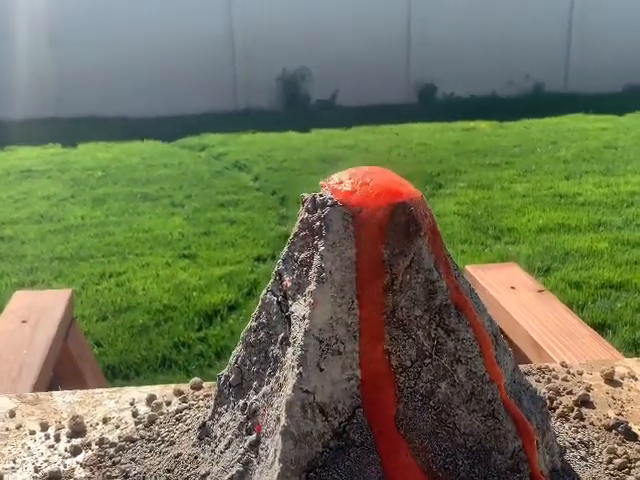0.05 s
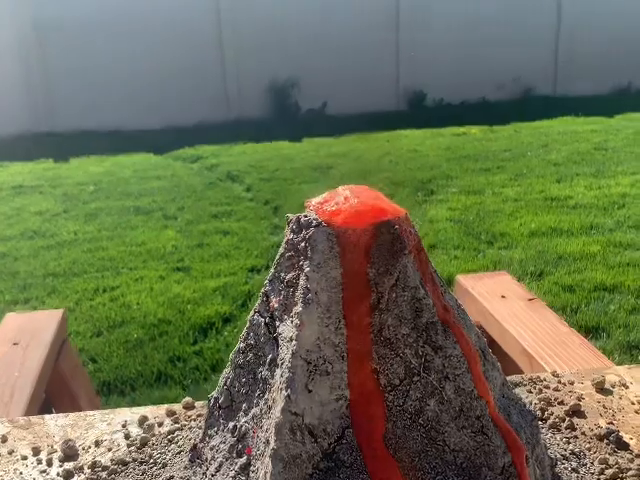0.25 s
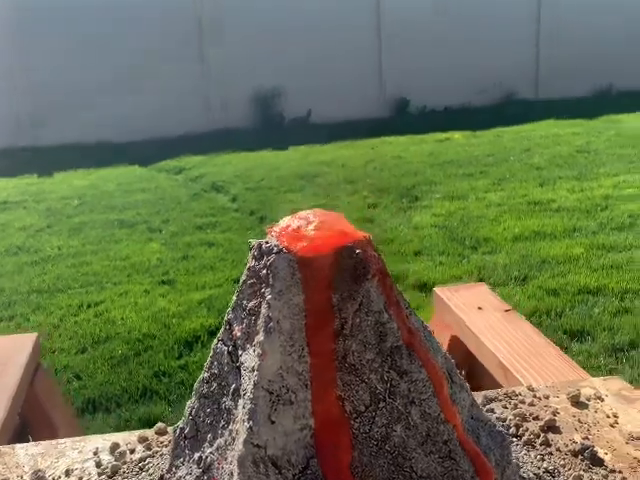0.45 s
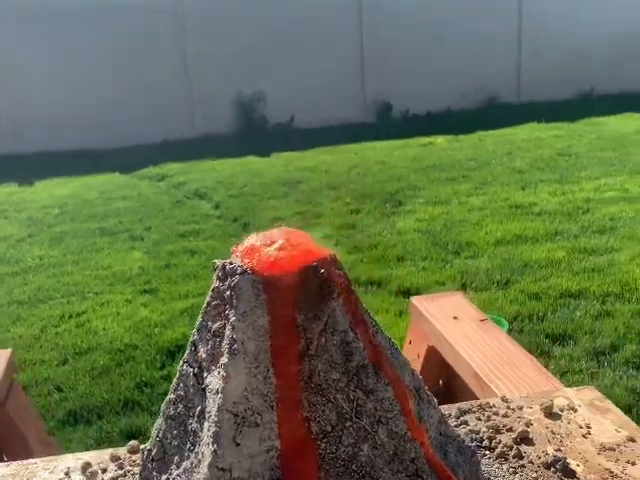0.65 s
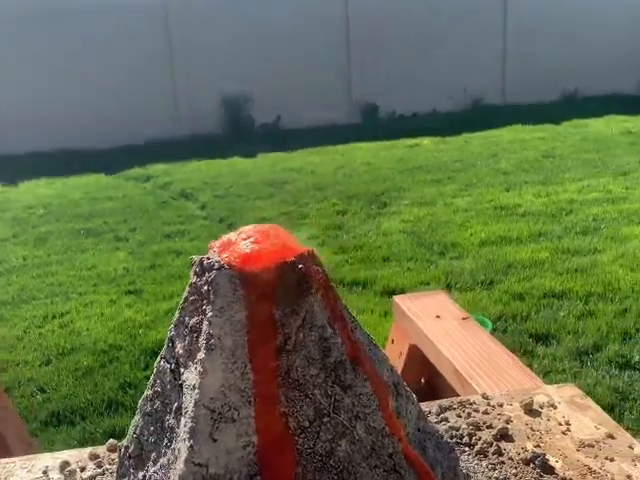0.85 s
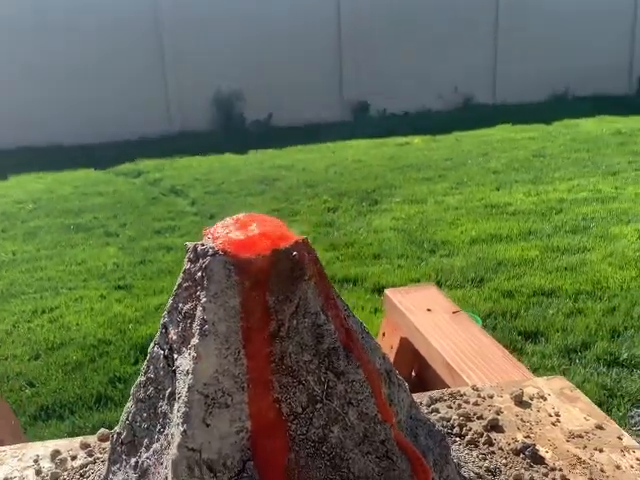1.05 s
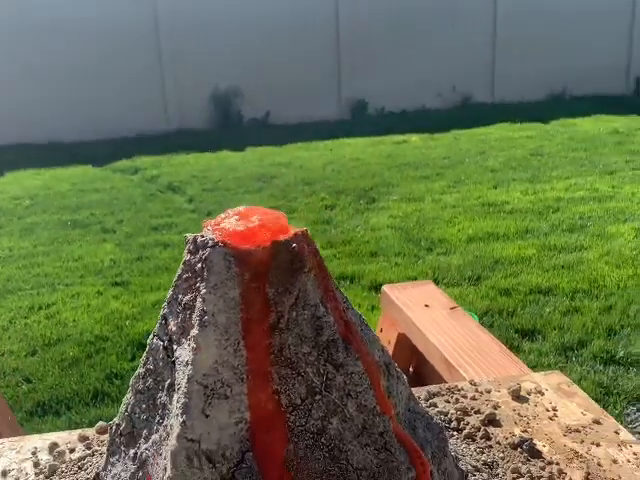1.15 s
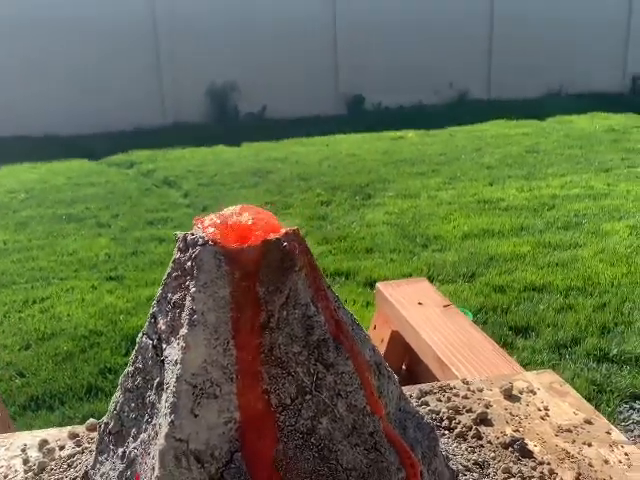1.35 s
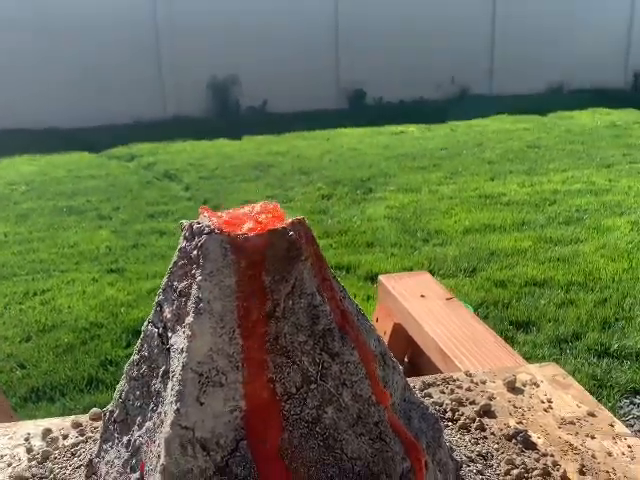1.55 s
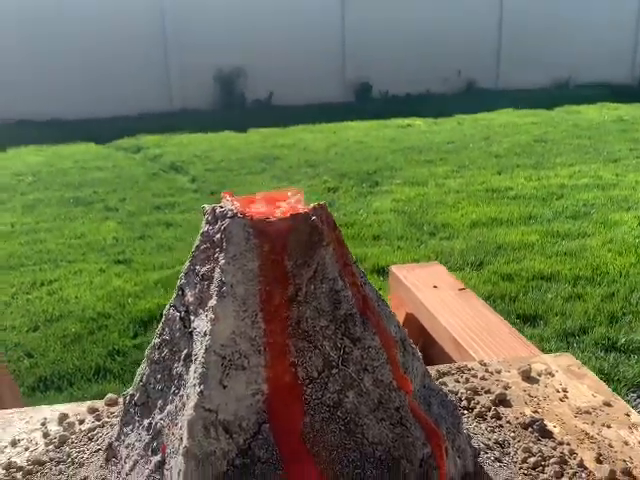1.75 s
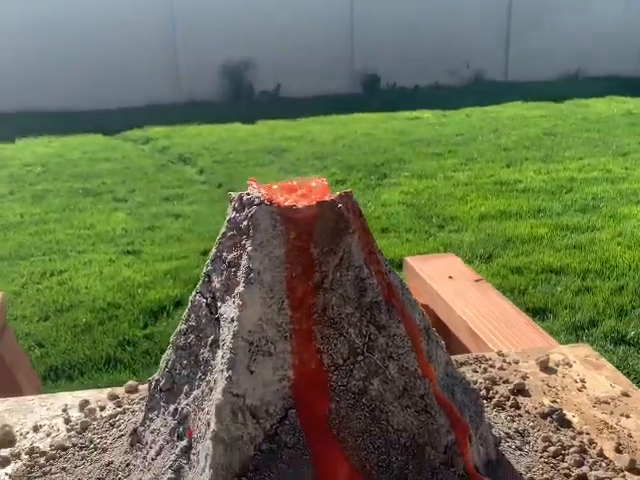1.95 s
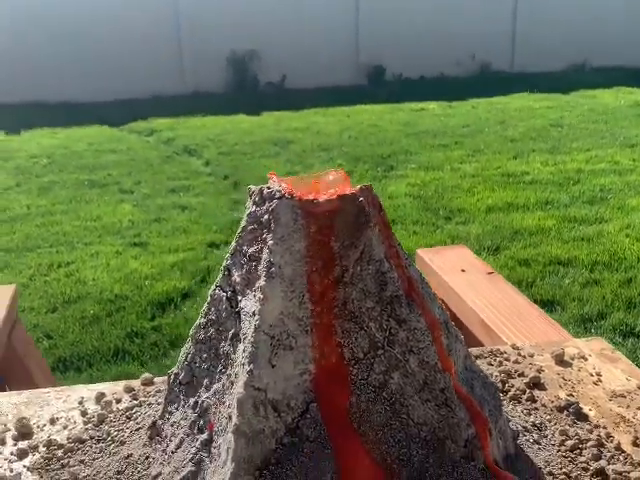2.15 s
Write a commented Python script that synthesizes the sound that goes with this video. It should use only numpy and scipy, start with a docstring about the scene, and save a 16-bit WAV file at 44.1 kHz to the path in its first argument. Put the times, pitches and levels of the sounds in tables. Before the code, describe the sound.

Foam fizzing and popping out of a model volcano, with light wind on the microphone.

```python
"""Fizzing model volcano

Foam fizzes out of a model volcano on a garden table, close to the microphone. Thousands of
tiny bubbles hiss, gas escapes through gaps, and now and then a large bubble bursts with a snap
and a short ring. A light breeze buffets the microphone's two openings over faint outdoor air."""
import sys
import numpy as np
from scipy import signal
from scipy.fft import rfft, irfft
from scipy.io import wavfile
from scipy.ndimage import uniform_filter1d, map_coordinates

SR = 44100
rng = np.random.default_rng(int(sys.argv[2]) if len(sys.argv) > 2 else 0)


def wav_out(sig):
    """Save sig, one row per channel (or a flat mono array), as 16-bit PCM at SR to the path in sys.argv[1]."""
    wavfile.write(sys.argv[1], SR, np.round(np.clip(np.atleast_2d(sig).T, -1, 1) * 32767).astype(np.int16))


N = 97020
POP_SAMPLES = int(.06 * SR)  # room for one bubble's sound to die away


def undb(db):
    """Turn decibels into a number to multiply by."""
    return 10 ** (np.asarray(db) / 20)


def unit(x):
    """Scale a sound to an average power of one."""
    return x / np.sqrt(np.mean(x ** 2))


def curve(table, column=1):
    """Join one column of a table with straight lines in time."""
    rows = np.array(table)
    return np.interp(np.arange(N) / SR, rows[:, 0], rows[:, column])


def along_hz(f, points):
    """Read between (Hz, value) points, giving each octave equal room."""
    hz, value = np.array(points).T
    return np.interp(np.log(np.maximum(f, 1)), np.log(hz), value)


def colour(x, points):
    """Shape a sound's tone by (Hz, dB) points, fading beyond both ends, at a power of one."""
    size = x.shape[-1]
    f = np.fft.rfftfreq(size, 1 / SR)
    ends = (np.minimum(f / points[0][0], 1) / np.maximum(f / points[-1][0], 1)) ** 2
    return unit(irfft(rfft(x) * ends * undb(along_hz(f, points)), size))


def wander(per_s):
    """A smooth random wobble, about one in size."""
    size = int(SR / per_s)
    return unit(uniform_filter1d(uniform_filter1d(rng.standard_normal(N), size), size))


def arrive(x):
    """A sound is heard on both sides: its lows come first on the left, its highs first on the right."""
    f = np.fft.rfftfreq(len(x), 1 / SR)
    right_lag_s = np.where(f < 2510, .00008, -.0002131)
    right = irfft(rfft(x) * np.exp(-2j * np.pi * f * right_lag_s), len(x))
    return np.array([x, right])


def openings(three):
    """Both openings hear the first of three signals; the other two are each side's own reflections."""
    # how alike the two sides are (frequency [Hz], shared part [ratio, held to 0-1 below])
    likeness = [(600, -0.1), (1400, 1), (2300, 0.06), (5500, 0.11), (7500, 0.61), (9300, 0), (11600, 1.55)]
    size = three.shape[-1]
    share = np.clip(along_hz(np.fft.rfftfreq(size, 1 / SR), likeness), 0, 1)
    return irfft(np.sqrt(share) * rfft(arrive(three[0])) + np.sqrt(1 - share) * rfft(three[1:]), size)


def add(out, start_s, sound):
    """Mix a sound in at a given time."""
    i = int(np.clip(start_s * SR, 0, N - 1))
    out[:, i:i + sound.shape[-1]] += sound[..., :N - i]


def air():
    """Faint, distant outdoor rumble."""
    # tone of the open air (frequency [Hz], level [dB])
    air_tone = [(25, -21), (55, 1), (130, -23.5), (300, -46), (1000, -43.5)]
    return colour(rng.standard_normal(N), air_tone) * undb(-59.5)


def turbulence(tone):
    """Swirling air pressure, evened out to a steady strength."""
    swirl = colour(rng.standard_normal(N), tone)
    power = uniform_filter1d(abs(signal.hilbert(swirl)) ** 2, size=700)
    return unit(swirl / np.sqrt(power))


def wind():
    """Gusts rumble on the microphone; strong ones shed small, fast swirls at each opening."""
    # strength of the gusts (time [s], level [dB])
    gusts = [(0.0, -71), (.1, -59), (.145, -42), (.19, -52.5), (0.23, -41.5), (0.27, -24), (0.47, -34.5),
             (0.61, -64.5), (0.675, -43), (0.745, -56), (0.8, -40), (0.92, -42.5), (0.97, -28.5),
             (1.05, -48), (1.18, -30), (1.24, -51), (1.26, -29.5), (1.32, -56.5), (1.355, -34.5),
             (1.4, -51), (1.425, -36.5), (1.47, -54.5), (1.58, -40.5), (1.61, -54.5), (1.67, -37.5),
             (1.9, -32.5), (1.99, -56), (2.035, -41.5), (2.1, -54.5), (2.2, -52)]
    # tone of the rumble (frequency [Hz], level [dB])
    rumble_tone = [(20, -56), (35, -8), (50, 6.5), (66, 4), (90, 1), (125, -5.5), (170, -24), (240, -35.5),
                   (330, -45), (600, -52.5)]
    # tone of the small swirls (frequency [Hz], level [dB])
    swirl_tone = [(60, -23), (120, -9.5), (180, 25.5), (260, 1.5), (350, -9.5), (480, -6), (800, -60)]
    gust_db, strong_gust_db = curve(gusts), -28.5
    rumble = turbulence(rumble_tone) * undb(gust_db - 2)
    swirl_db = -51 + 1.26 * (gust_db - strong_gust_db)  # grows faster than the gust
    swirls = np.array([turbulence(swirl_tone), turbulence(swirl_tone)]) * undb(swirl_db)
    return rumble + swirls


def buffets():
    """Single puffs of wind thump the right opening, then the left."""
    # sharp puffs (time [s], pitch [Hz], peak level [dB], half-length [s])
    puffs = [(.274, 247, -32, 0.002), (.345, 294, -45, 0.0042), (.395, 252, -25.5, 0.003),
             (.808, 165, -35.5, 0.0097), (1.158, 194, -37, 0.0055), (1.583, 132.5, -35, 0.0073),
             (1.775, 164, -41, 0.021), (1.872, 200, -39, 0.0035)]
    crossing_s = .00094
    t = np.arange(N) / SR + np.array([[-.5], [.5]]) * crossing_s
    return sum(undb(db) * np.exp(-((t - at) / half_s) ** 2) * np.cos(2 * np.pi * hz * (t - at))
               for at, hz, db, half_s in puffs)


def crater(x):
    """Eight quick echoes from the rough crater rim make the fizz faintly hollow."""
    f = np.fft.rfftfreq(N, 1 / SR)
    lags_s = .008 * rng.uniform(.1, 1, size=(8, 1))
    echoes = undb(-18) * np.exp(-2j * np.pi * f * lags_s).sum(axis=0)
    return irfft(rfft(x) * (1 + echoes), N)


def crackle(tone, bubbles_per_s=9000, spread_db=2.5, flutter_db=2):
    """A dense rain of tiny bursts, most weak and a few strong, with a fluttering level."""
    shape = (3, N)
    bursts = rng.random(shape) < bubbles_per_s / SR
    sizes = undb(spread_db * np.minimum(rng.exponential(size=shape), 6))
    signs = np.sign(rng.standard_normal(shape))
    clicks = crater(openings(bursts * sizes * signs))
    return colour(clicks, tone) * undb(flutter_db * wander(per_s=26))


def gas_jets(fade_s=.12, sag_per_s=.4, width_hz=1400, edge_db=-24):
    """Jets of gas swell and fade, sinking in pitch as their gaps widen."""
    # gas hissing through gaps in the foam (start [s], end [s], pitch halfway [Hz], level [dB])
    jets = [(0.221, 0.598, 3010, -63.5), (.25, 0.699, 6270, -66)]
    t, out = np.arange(N) / SR, 0
    for start, end, hz, db in jets:
        flow = np.clip(np.minimum(t - start, end - t) / fade_s, 0, 1)
        speed = np.exp(-sag_per_s * (np.clip(t, start, end) - (start + end) / 2))
        hiss = crackle([(hz - width_hz, edge_db), (hz, 0), (hz + width_hz, edge_db)])
        # playing the hiss ever more slowly lowers its pitch
        sinking = np.array([map_coordinates(side, [np.cumsum(speed)], mode="mirror") for side in hiss])
        out = out + sinking * np.sqrt(flow) * undb(db)
    return out


def fizz():
    """The foam breaks: small bubbles simmer and the very finest hiss."""
    # tone of the simmer (frequency [Hz], level [dB])
    simmer_tone = [(330, -8), (480, -1), (640, -4), (870, -4), (1350, -0.5), (2000, -0.5), (2500, 0.5),
                   (2950, -5.5), (4200, -1), (5100, -3.5), (6200, -2), (7400, 1.5), (10000, -16.5)]
    # tone of the hiss (frequency [Hz], level [dB])
    hiss_tone = [(3000, -51), (6300, -16), (7400, -12.5), (8500, 4.5), (9500, 0), (10700, 0.5),
                 (11500, -30), (12400, 4), (14200, -5), (15200, -2.5), (15700, -30)]
    # loudness of the foam (time [s], simmer level [dB], hiss level [dB])
    levels = [(0, -60, -60), (.36, -60, -62.5), (.62, -59.5, -61), (.75, -64.5, -63.5), (.86, -62, -61),
              (.9, -60, -59), (.96, -63, -60.5), (1.24, -61, -62), (1.3, -57.5, -60), (1.58, -60.5, -63.5),
              (1.92, -63, -63.5), (2.2, -66.5, -62.5)]
    simmer = crackle(simmer_tone) * undb(curve(levels, column=1))
    hiss = crackle(hiss_tone) * undb(curve(levels, column=2))
    return simmer + hiss


def ticks(per_s=31, low_hz=937, high_hz=7900, decay_cycles=4.6):
    """Medium bubbles ring for a few cycles each, at random times and pitches."""
    out, t = np.zeros((2, N)), np.arange(POP_SAMPLES) / SR
    for when, pitch, size, side in rng.random((400, 4))[:int(per_s * N / SR)]:
        hz = low_hz * (high_hz / low_hz) ** pitch
        ring = np.sin(2 * np.pi * hz * t) * np.exp(-t * hz / decay_cycles)
        level_db = -63 - 1.5 * np.log(1 - size)  # mostly quiet, a few louder
        left_right = np.sqrt([[1.5 - side], [.5 + side]])
        add(out, when * N / SR, left_right * ring * undb(level_db))
    return out


def snap_tone(weaker_db, dull_above_hz=4500):
    """Gentler bursts lose their highest notes."""
    # tone of the strongest tearing film (frequency [Hz], level [dB])
    tear_tone = [(800, -47), (2000, -13.5), (4000, -2.5), (5000, -4.5), (6400, 3), (7400, -1.5), (7900, -5),
                 (8700, 6), (10200, -3), (13000, -1.5), (14500, -5.5), (16000, -3.5)]
    return [(hz, db - .08 * weaker_db * max(np.log2(hz / dull_above_hz), 0)) for hz, db in tear_tone]


def burst(t, tone, tail_s, hold_s=.0012, decay_s=.00073):
    """A bubble's film tears in a flash of noise, trailed by echoes from the volcano's cone."""
    tear = np.exp(-np.maximum(t - hold_s, 0) / decay_s)
    echoes = undb(-2.5) * np.exp(-t / tail_s)
    noise = openings(rng.standard_normal(size=(3, len(t))))
    return np.hypot(tear, echoes) * colour(noise, tone)


def cavity(t, hz, decay_s):
    """The air pocket of an opened bubble rings on one dying note."""
    return np.exp(-t / decay_s) * arrive(np.sin(2 * np.pi * hz * t))


def pops(rise_s=.0011, overtone_ratio=2.35):
    """A large bubble's film snaps, the hollow foam adds body, and the air pocket rings on two notes."""
    # large bubbles bursting
    # (time [s], body level [dB], snap level [dB], ring pitch [Hz], ring level [dB], overtone level [dB])
    bubbles = [(0.0151, -45.5, -32.5, 1363, -37, -59), (0.1432, -40, -35.5, 1600, -47, -75),
               (0.2931, -49.5, -37.5, 1320, -42, -40), (0.6404, -51.5, -38.5, 1813, -67, -41),
               (0.6771, -44.5, -42.5, 1590, -53, -60), (0.8809, -49, -46.5, 1180, -63, -34),
               (.921, -55, -57, 1630, -63, -49), (0.987, -46.5, -35, 1778, -64, -42.5),
               (1.0665, -54, -56, 1413, -44, -52), (1.2723, -47, -47, 1050, -43.5, -63),
               (1.326, -56, -44.5, 854, -46, -60), (1.370, -54.5, -58, 760, -48.5, -54),
               (1.503, -43.5, -33, 1753, -39.5, -40.5), (1.8199, -41.5, -40, 1570, -36, -54),
               (1.8232, -51, -60, 2280, -35.5, -63), (1.836, -52, -64, 860, -43, -64),
               (1.9644, -57, -34.5, 5990, -35, -60), (1.9643, -59, -48, 1703, -40, -43),
               (2.013, -56, -61, 1110, -51, -58)]
    # tone of the hollow foam (frequency [Hz], level [dB])
    body_tone = [(200, 0), (520, -5.5), (760, 2.5), (1050, 2), (1650, 3), (2400, 3), (3700, -4.5)]
    out, t = np.zeros((2, N)), np.arange(POP_SAMPLES) / SR
    rise = np.minimum(t / rise_s, 1)
    strongest_db = max(row[2] for row in bubbles)
    for start, body_db, snap_db, ring_hz, ring_db, overtone_db in bubbles:
        body = undb(body_db) * burst(t, body_tone, tail_s=.01)
        snap = undb(snap_db) * burst(t, snap_tone(strongest_db - snap_db), tail_s=.004)  # highs die first
        ring = undb(ring_db) * cavity(t, ring_hz, decay_s=.0029)
        overtone = undb(overtone_db) * cavity(t, overtone_ratio * ring_hz, decay_s=.003)
        add(out, start, rise * (body + snap + ring + overtone))
    return out


def scene():
    """Foam in front, breeze and garden around it."""
    return fizz() + gas_jets() + ticks() + pops() + wind() + buffets() + air()


def record(dry, tilt_from_hz=400, top_hz=15800):
    """The right opening picks up middle pitches more strongly, and the very top is cut off."""
    # how much louder the right side is than the left (frequency [Hz], level [dB])
    right_extra = [(1300, 0.9), (3000, 1), (5500, 3.5), (7500, 0)]
    f = np.fft.rfftfreq(N, 1 / SR)
    above_bass = np.clip(f / tilt_from_hz - .5, 0, 1)  # the bass stays equal on both sides
    tilt_db = along_hz(f, right_extra) * above_bass * np.array([[-.5], [.5]])
    heard = irfft(rfft(dry) * undb(tilt_db), N)
    return signal.sosfilt(signal.ellip(8, .2, 70, top_hz, fs=SR, output="sos"), heard)


dry = scene()
out = record(dry)
wav_out(out)
```